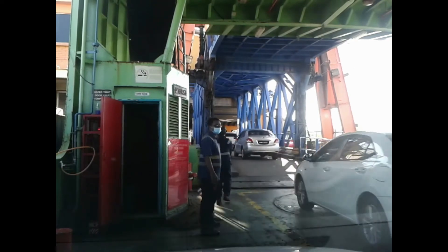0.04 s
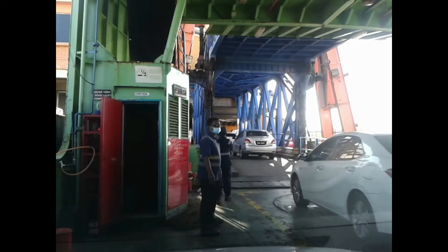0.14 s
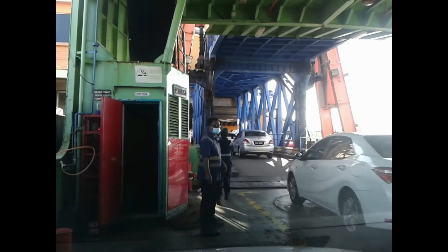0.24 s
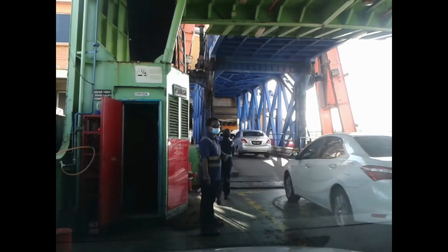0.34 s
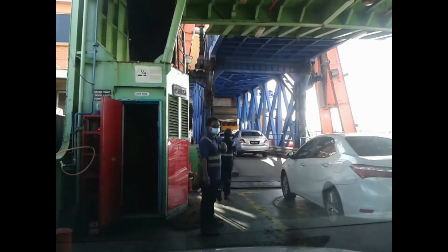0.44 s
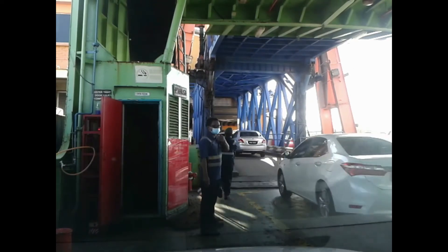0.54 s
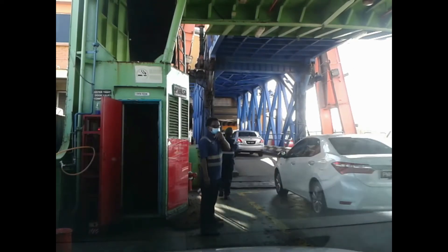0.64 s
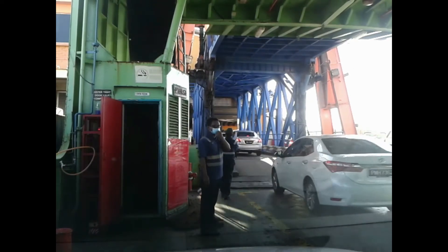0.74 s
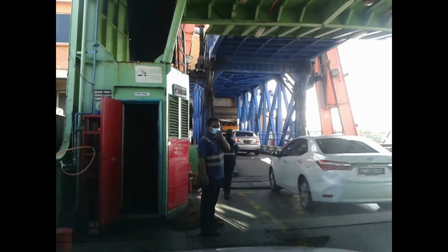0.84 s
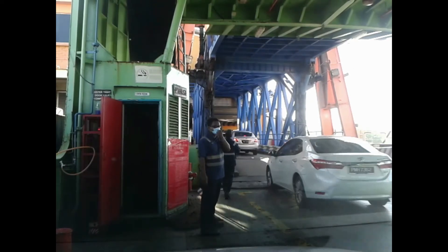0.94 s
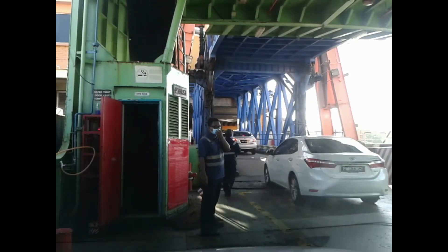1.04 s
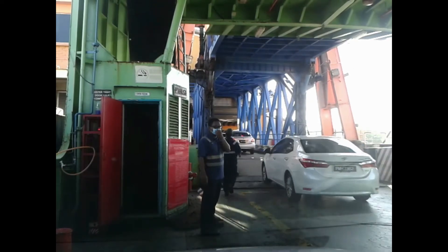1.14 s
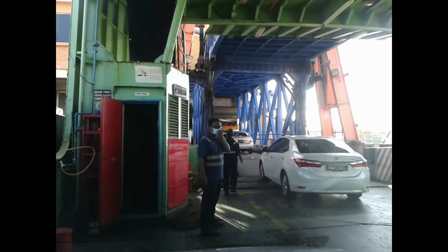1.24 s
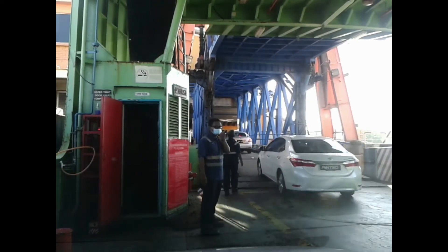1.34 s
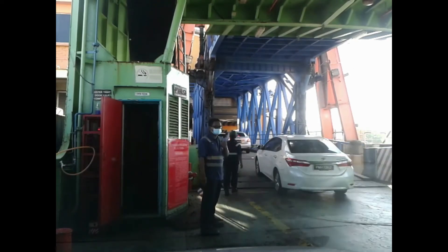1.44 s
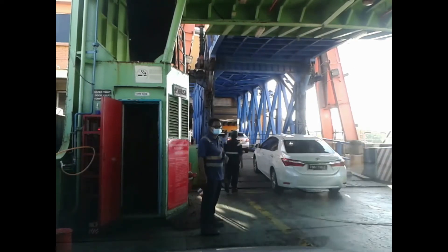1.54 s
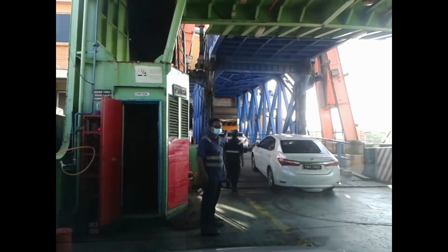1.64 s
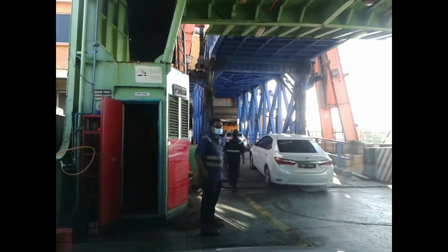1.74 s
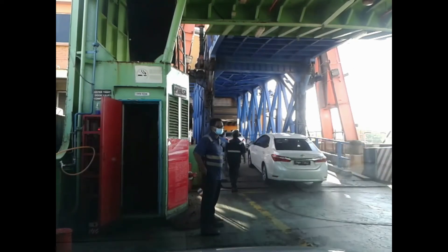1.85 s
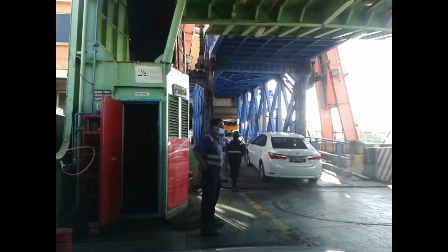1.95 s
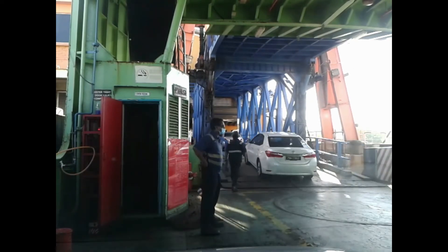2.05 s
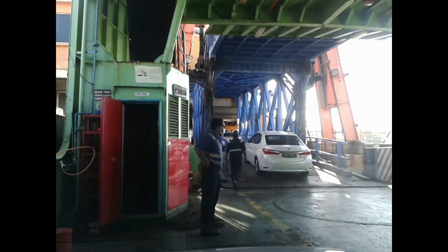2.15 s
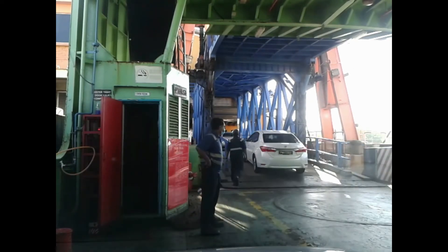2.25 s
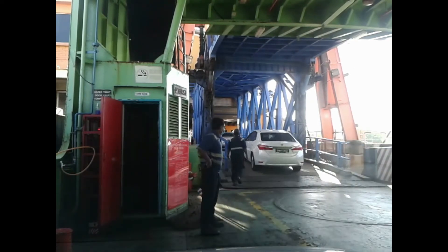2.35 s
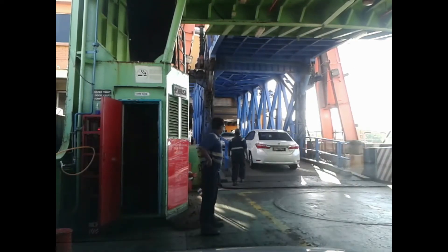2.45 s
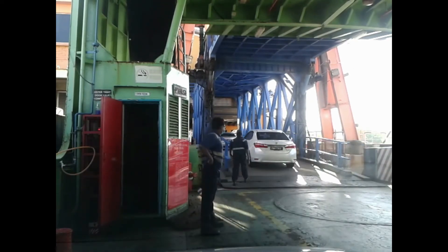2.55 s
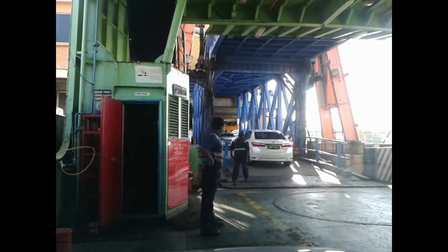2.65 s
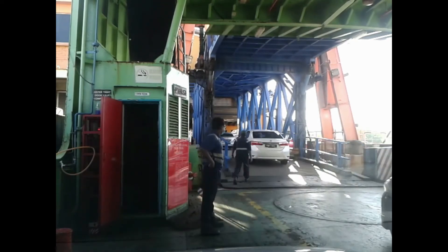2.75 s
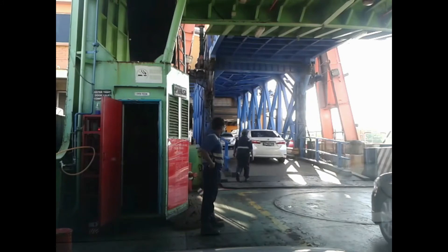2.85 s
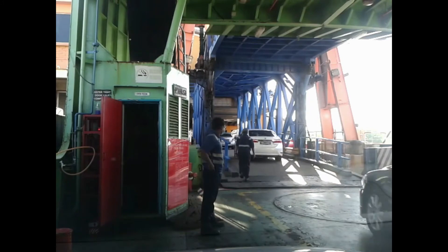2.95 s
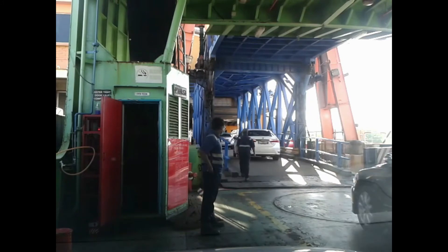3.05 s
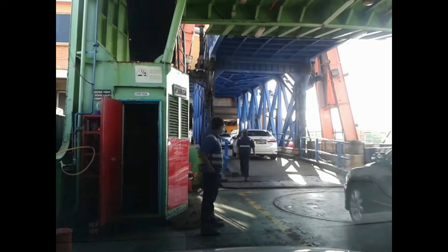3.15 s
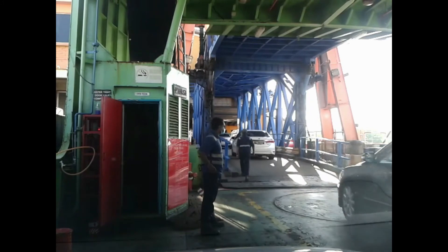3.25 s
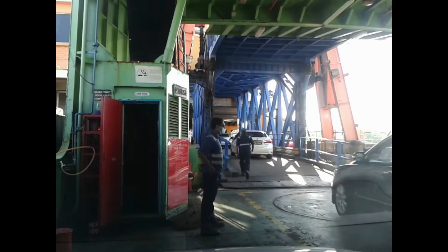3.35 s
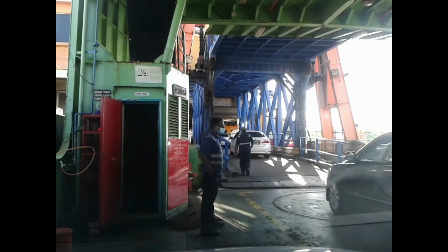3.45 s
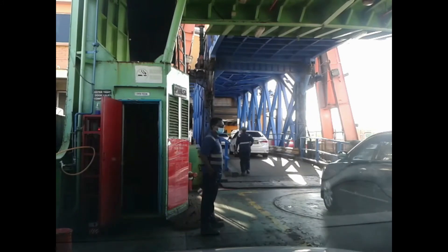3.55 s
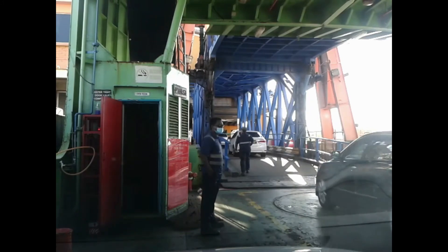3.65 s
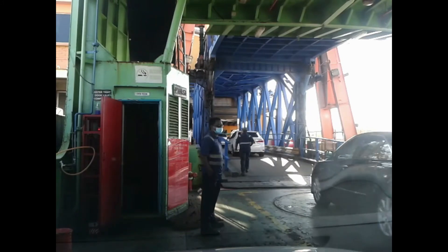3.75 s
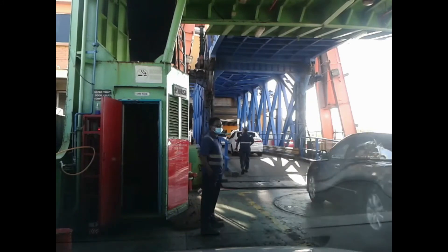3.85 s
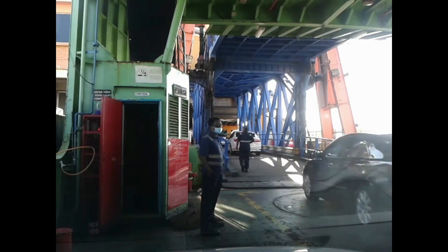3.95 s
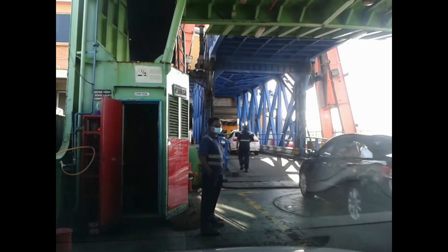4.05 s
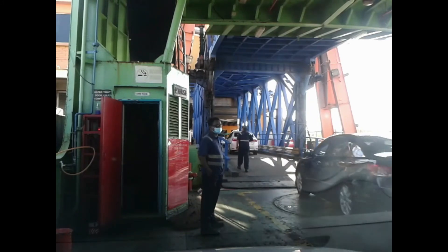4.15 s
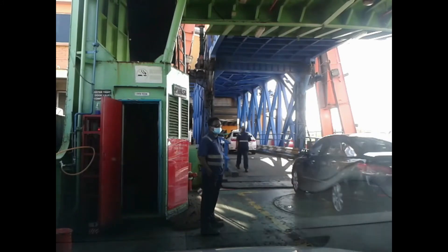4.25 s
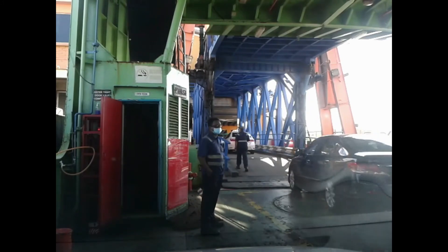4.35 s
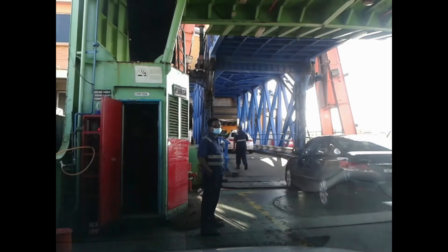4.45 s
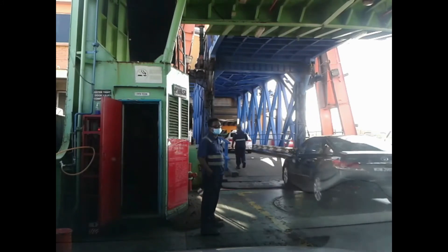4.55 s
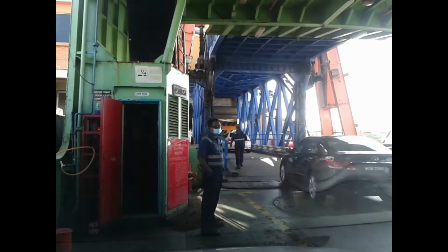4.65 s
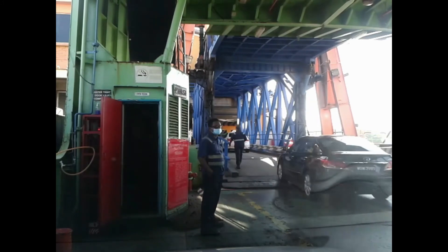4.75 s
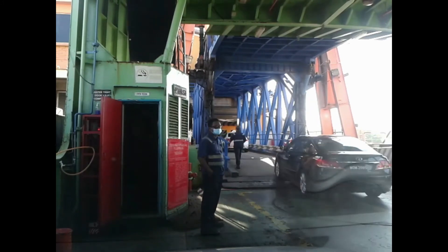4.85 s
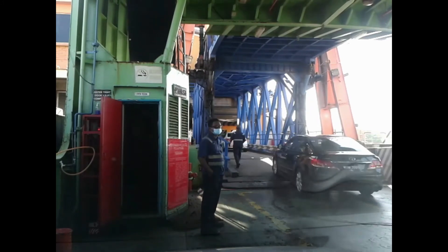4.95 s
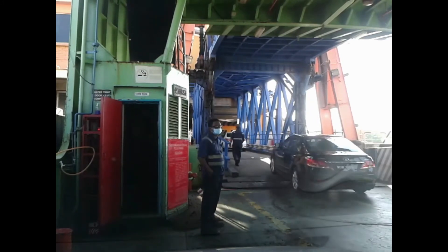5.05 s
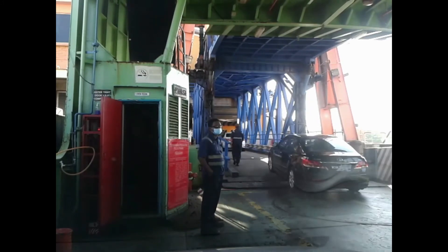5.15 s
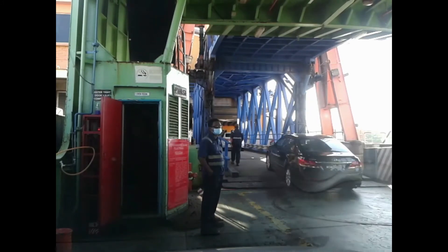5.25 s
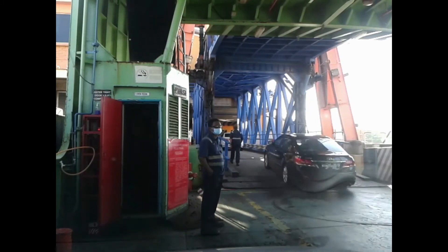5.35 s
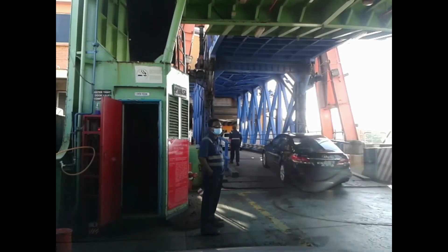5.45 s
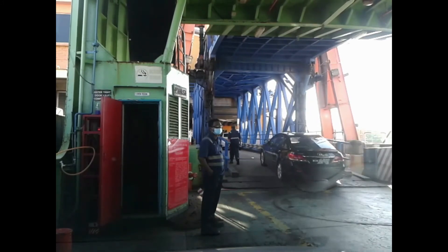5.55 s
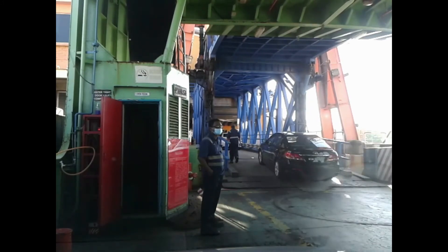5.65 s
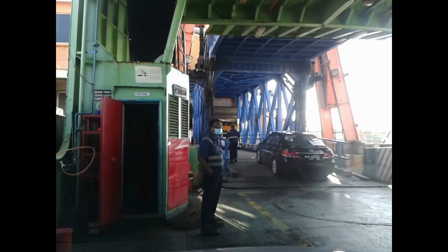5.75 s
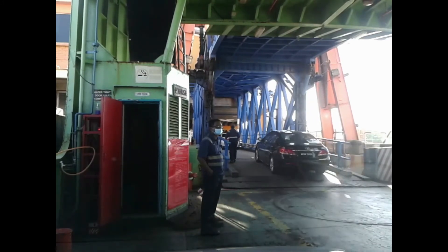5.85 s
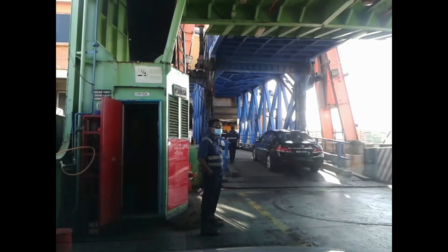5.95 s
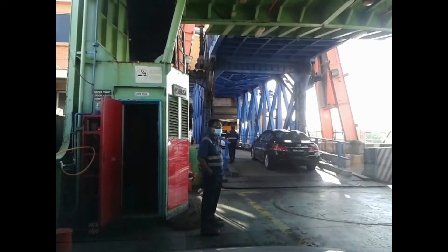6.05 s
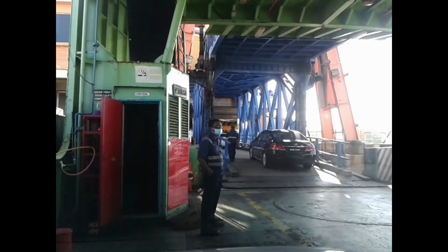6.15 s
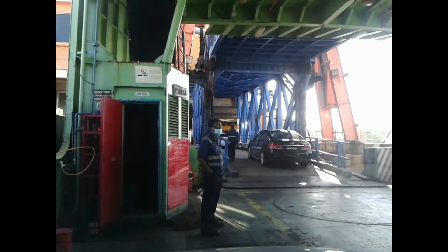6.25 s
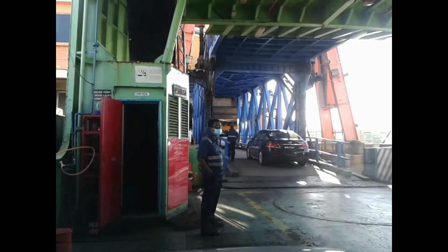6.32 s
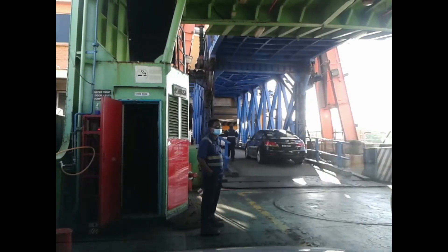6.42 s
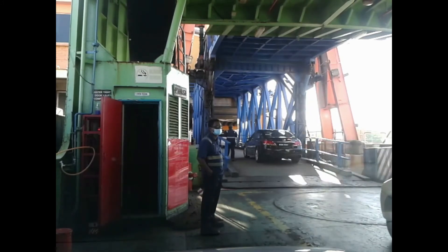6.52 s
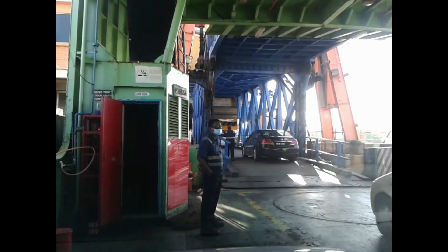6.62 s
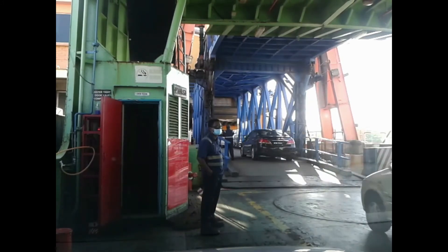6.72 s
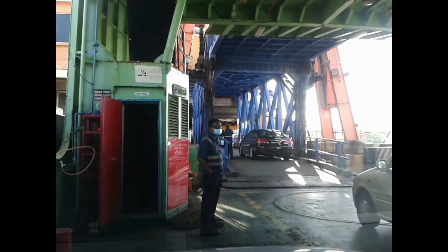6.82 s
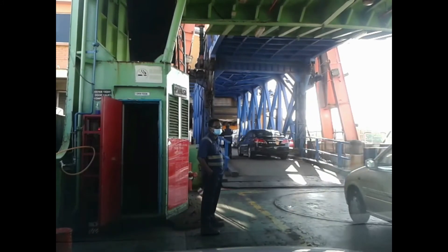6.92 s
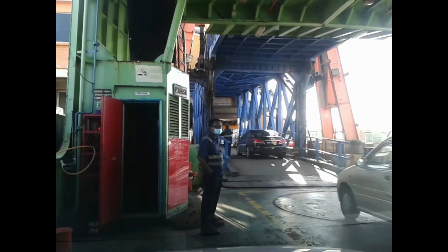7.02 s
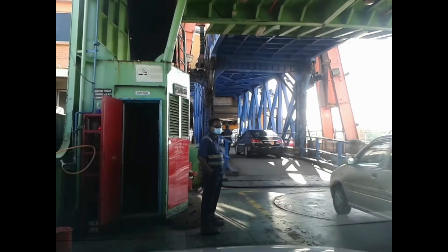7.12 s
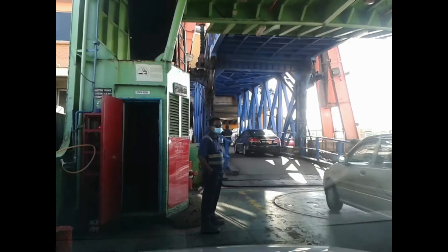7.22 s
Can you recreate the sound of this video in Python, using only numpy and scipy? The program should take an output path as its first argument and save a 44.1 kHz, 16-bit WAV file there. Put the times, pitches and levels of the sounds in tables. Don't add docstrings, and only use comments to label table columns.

```python
import sys
import numpy as np
from scipy import signal
from scipy.fft import rfft, irfft
from scipy.io import wavfile
from scipy.ndimage import uniform_filter1d

SR = 44100
rng = np.random.default_rng(int(sys.argv[2]) if len(sys.argv) > 2 else 0)


def int16_out(signal):
    q = np.round(np.clip(np.atleast_2d(signal).T, -1, 1) * 32767)
    wavfile.write(sys.argv[1], SR, q.astype(np.int16))


def ratio_of_db(decibels):
    return 10 ** (np.asarray(decibels, float) / 20)


N = 321048
T = np.arange(N) / SR


def rms_one(x):
    return x / np.sqrt(np.mean(x ** 2) + 1e-20)


def in_time(rows):
    s, level_db = np.transpose(rows)
    return np.interp(T, s, level_db)


def drift(rate):
    step = 40
    r = np.exp(-2 * np.pi * step * rate / SR)
    slow = signal.lfilter([1], [1, -2 * r, r * r], rng.standard_normal(N // step + 4002))[4000:]
    return np.interp(np.arange(N) / step, np.arange(len(slow)), rms_one(slow - slow.mean()))


def colour(x, spectrum):
    hz = np.maximum(np.fft.rfftfreq(N, 1 / SR), 1)
    points = np.array(spectrum)
    level_db = np.interp(np.log(hz), np.log(points[:, 0]), points[:, 1], left=-70, right=-90)
    return rms_one(irfft(rfft(x) * ratio_of_db(level_db), N))


def resonate(x, hz, width_hz):
    r = np.exp(-np.pi * abs(width_hz) / SR)
    zeros = [(1 - r * r) / 2, 0, (r * r - 1) / 2]
    poles = [1, -2 * r * np.cos(2 * np.pi * hz / SR), r * r]
    return signal.lfilter(zeros, poles, x)


def body(x, modes, wander_db=0):
    out = np.zeros(N)
    for k, (hz, width_hz, db) in enumerate(modes):
        strength_db = db + wander_db * drift(6.3) if wander_db else db
        out += (-1) ** k * ratio_of_db(strength_db) * resonate(x, hz, width_hz)
    return out


def grains(per_s, spread_db):
    size = ratio_of_db(spread_db * np.minimum(rng.exponential(1, N), 4)) * rng.choice([-1, 1], N)
    return rms_one(size * (rng.random(N) < per_s / SR))


def tone(hz, wobble_hz):
    phase = 2 * np.pi * np.cumsum(hz + wobble_hz * drift(1.72)) / SR
    return np.sqrt(2) * np.sin(phase + rng.uniform(0, 2 * np.pi))


# (wheel meets the edge [s], climb to full weight [s], time on the plates [s],
# bright shaking [dB], deep shaking [dB])
AXLES = [
    (1.068, .025, .35, -20, -19.5),
    (1.791, .17, .29, -21, -19.8),
    (4.605, .055, .28, -19.5, -20.8),
    (5.385, .055, .27, -19.5, -22),
]


def load(column, sag, lag_s, steep, first_fall, late_fall, offset_db):
    touch_s, touch_db, silent_db = 0.028, -6.5, -38.5
    first_fall_s = 0.14
    power = 0
    for axle in AXLES:
        start, climb, stay = axle[:3]
        age = T - start - lag_s
        after = np.maximum(T - start - stay, 0)
        step_db = touch_db * min(climb / 0.12, 1)
        rise_db = np.interp(age, [0, touch_s, touch_s + climb], [silent_db, step_db, 0])
        sag_db = sag * np.clip(age - climb, 0, stay)
        fall_db = first_fall * np.minimum(after, first_fall_s)
        fall_db = fall_db + late_fall * np.maximum(after - first_fall_s, 0)
        power = power + ratio_of_db(axle[column] + offset_db + steep * rise_db - sag_db - fall_db) ** 2
    return power ** .5


# (time [s], shaking [dB], rattle [dB])
SLAMS = [
    (1.12, -27, -33.5),
    (1.99, -21, -48),
    (4.675, -25, -33.5),
    (4.76, -24, -49),
    (5.6, -29, -47),
]


def slams(column):
    rise_s, decay_s = .012, .027
    out = np.zeros(N)
    for slam in SLAMS:
        age = np.maximum(T - slam[0], 0)
        out += 2 * ratio_of_db(slam[column]) * (1 - np.exp(-age / rise_s)) * np.exp(-age / decay_s)
    return out


# (frequency [Hz], width [Hz], level [dB])
PLATE = [(400, 84, -10), (527, 67.5, -7.5), (614.4, 53, -6.5), (733, 214, -15.5), (974, 90, -11.5),
         (1048, 36, -12.5), (1144, 34, -15), (1258, 57, -18), (1482, 56, -18.5), (1623, 70, -22.5),
         (1970, 390, -32.5), (2130, 25, -23), (2230, 680, -36)]
# (frequency [Hz], width [Hz], level [dB])
BEAM = [(70, 37, -10.5), (130, 45, -2), (201, 50, -2.5), (255, 51.5, -5)]
# (frequency [Hz], density [dB per Hz])
RATTLE = [(1200, -12.5), (2000, 5.5), (3200, 1.5), (5000, 8), (7000, -12.5), (8200, -24), (9500, -32.5),
          (12000, -46.5)]


def ramp():
    bumps = grains(per_s=2500, spread_db=2.0)
    flex = rms_one(body(bumps, BEAM))
    deep = body(bumps, PLATE[:4], wander_db=1.3)
    bright = body(bumps, PLATE[4:], wander_db=1.3)
    scale = np.sqrt(np.mean((deep + bright) ** 2))
    rattle = colour(grains(per_s=8000, spread_db=2.5), RATTLE)
    jolt = ratio_of_db(.5 * drift(25))

    deep_sag, bright_sag = 1.5, 14.2
    flex_gain = load(4, deep_sag, lag_s=.015, steep=.9, first_fall=45, late_fall=60, offset_db=1.2)
    deep_gain = load(4, deep_sag, lag_s=.006, steep=1.0, first_fall=55, late_fall=33, offset_db=-.9)
    bright_gain = load(3, bright_sag, lag_s=0, steep=.8, first_fall=55, late_fall=28, offset_db=-1.07)
    rattle_gain = load(3, bright_sag, lag_s=.02, steep=2.1, first_fall=100, late_fall=45, offset_db=-20)

    shaking = slams(column=1)
    plates = (np.hypot(deep_gain, shaking) * deep + np.hypot(bright_gain, shaking) * bright) / scale
    chatter = np.hypot(rattle_gain, slams(column=2)) * rattle
    return flex_gain * flex + jolt * (plates + chatter)


# (time [s], hold [s], level [dB])
CRUSH = [
    (1.107, 0.18, -43.5),
    (1.877, .08, -49),
    (4.67, .1, -46.5),
    (5.5, .08, -47.5),
]
# (frequency [Hz], density [dB per Hz])
GRIT_COLOUR = [(3000, -15.5), (4300, 2.5), (5500, -2.5), (7000, -4), (8200, -16.5), (9500, -36.5)]


def grit():
    rise_s, fall_db_per_s = 0.033, 100
    gain = np.zeros(N)
    for s, hold, db in CRUSH:
        swell = np.clip((T - s) / rise_s, 0, 1) ** 2
        gain += swell * ratio_of_db(db - fall_db_per_s * np.maximum(T - s - hold, 0))
    return gain * colour(grains(per_s=9000, spread_db=1.0), GRIT_COLOUR)


# (start [s], length [s], level [dB], extra level of its weaker partials [dB])
BAR_SPELLS = [
    (1.335, .12, 2, 2.5),
    (1.48, .14, 2, -10),
    (4.72, .3, -4, .5),
    (5.44, .36, -1.5, -1.5),
]
# (frequency [Hz], level [dB rms], joins [share of spell], leaves [share of spell])
BAR = [(5047, -52, 0, 1), (4245, -57, -.2, 1.1), (3145, -60, 0, 1.1), (2159, -55, -.1, .3),
       (7235, -66, .35, .85), (2813, -61, .4, .85)]
# (start [s], length [s], level [dB], level of its side partials [dB])
SHACKLE_SPELLS = [
    (1.24, .11, -63, -82),
    (1.43, .16, -72, -67),
    (4.675, .17, -63, -75),
    (4.93, .04, -69, -85),
    (5.49, .29, -65, -71),
]
# (frequency [Hz], level [dB], joins [share of spell], leaves [share of spell])
SHACKLE_SIDES = [(11125, 0, .1, .7), (10735, -1, .1, .6), (10945, 0, .05, .95), (8420, -3, .1, .6)]
# (start [s], end [s], frequency [Hz], level [dB rms])
LINK = [
    (.585, .77, 1606, -44.5),
    (.62, .72, 8500, -68),
]


def singing():
    notes = []
    for s, length, spell_db, weak_db in BAR_SPELLS:
        for hz, db, joins, leaves in BAR:
            level_db = db + spell_db + weak_db * (hz != BAR[0][0])
            notes.append((s + joins * length, s + leaves * length, hz, level_db))
    for s, length, main_db, side_db in SHACKLE_SPELLS:
        notes.append((s, s + length, 10870, main_db))
        for hz, db, joins, leaves in SHACKLE_SIDES:
            notes.append((s + joins * length, s + leaves * length, hz, side_db + db))

    out = np.zeros(N)
    for start, end, hz, level_db in notes + list(LINK):
        part = slice(int(start * SR), int(end * SR))
        size = part.stop - part.start
        swell = np.sin(np.linspace(0, np.pi, size)).clip(0) ** .35
        flutter = np.interp(np.arange(size), np.linspace(0, size, num=8), rng.standard_normal(8))
        phase = 2 * np.pi * np.cumsum(hz * (1 + .0008 * flutter)) / SR
        out[part] += ratio_of_db(level_db + 5 + 2.5 * flutter[::-1]) * swell * np.sin(phase)
    return out


# (time [s], peak [dB], fall by 60 dB [s], low knock [dB], hardness [dB])
CLICKS = [
    (.631, -33.5, 0.14, -25, -12),
    (2.041, -14, 0.086, -33, 0),
    (2.476, -38.5, 0.056, -56, -1),
    (2.569, -25.5, 0.075, -50, -1),
    (3.398, -44, 0.24, -31.5, -10),
    (4.684, -42, 0.067, -52, -4),
    (7.154, -45, 0.2, -45, -12),
]
# (frequency [Hz], density [dB per Hz])
CLICK = [(1200, -26.5), (2000, 0), (3000, -2), (3500, -5.5), (4000, 0.5), (5000, 5), (6600, -0.5),
         (8500, -4.5), (9800, -21), (11000, -13), (12000, -20.5)]
# (frequency [Hz], width [Hz], level [dB])
PANEL = [(1950, 200, -5), (2450, 250, -7), (3520, 260, 0), (4900, 300, -11)]


def clicks():
    crack = colour(rng.standard_normal(N), CLICK)
    panel = rms_one(body(rng.standard_normal(N), PANEL))
    knock = rms_one(body(rng.standard_normal(N), [(344, 37, 4.0), (1400, 210, -5)]))
    top = signal.sosfiltfilt(signal.butter(6, 8800, "high", fs=SR, output="sos"), crack)
    out = np.zeros(N)
    for s, peak_db, t60, knock_db, hard_db in CLICKS:
        snap = crack - top + ratio_of_db(1.2 * hard_db) * top
        rise_s = 0.0025 * ratio_of_db(.35 * (peak_db + 28.5))
        for lag, gain_db in ((0, 0.5), (.024, -22)):
            age = np.maximum(T - s - lag, 0)
            out += ratio_of_db(peak_db + gain_db - 60 * age / t60) * (1 - np.exp(-age / rise_s)) * snap
        late = np.maximum(T - s - .003, 0)
        out += ratio_of_db(peak_db + hard_db) * (1 - np.exp(-late / .0015)) * np.exp(-late / .007) * panel
        out += ratio_of_db(knock_db) * (1 - np.exp(-late / 0.0024)) * np.exp(-late / 0.028) * knock
    return out


def scuff():
    start, length, hz, width_hz = 6.87, .22, 2600, 1000
    swell = np.sin(np.pi * np.clip((T - start) / length, 0, 1))
    drag = rms_one(resonate(resonate(rng.standard_normal(N), hz, width_hz), hz, width_hz))
    streaks = rms_one(sum(resonate(drag, hz * share, 30) for share in (.83, .94, 1.04, 1.13)))
    return ratio_of_db(-52.5) * swell * (drag + .8 * streaks)


# (time [s], level [dB])
HUM = [(0.0, -27), (1.21, -24.5), (1.32, -30.5), (1.8, -23), (1.92, -32), (2.17, -23), (2.21, -34),
       (2.31, -24), (3.08, -28), (3.14, -34), (3.53, -27), (4.6, -27), (5.56, -20.5), (6.39, -28.5),
       (7.2, -24.5), (7.28, -28.5)]
# (frequency [Hz], level [dB rms])
ORDER_LINES = [(45.2, -45.5), (57.2, -40), (68.6, -43), (96.2, -39), (137.9, -37.5), (181, -41.5),
               (191.1, -37.5), (633, -48.5)]
# (time [s], level [dB])
DECK = [(0, -26), (.8, -25.5), (1.7, -24.5), (2.6, -26), (3.6, -26), (4.5, -25.5), (5.3, -26), (6.1, -28),
        (6.8, -25.5), (7.28, -24)]
# (frequency [Hz], density [dB per Hz])
ROAR = [(28, -40), (40, -21.5), (52, -3.5), (110, -5.5), (190, -2), (270, -7), (320, -14), (620, -15.5),
        (700, -16.5), (1000, -23), (1700, -30), (3500, -41.5), (5200, -42)]
# (frequency [Hz], width [Hz], level [dB])
DECK_MODES = [(125.2, 4.3, 8.5), (180.7, 12, -1), (260.5, 4.9, -1.5), (409.6, 16, -3), (542, 150, -9.5),
              (623.4, 12, 0), (932, 59, -1.5), (1033, 17, 3), (1142, 20, -4.5), (1264, 20, 3),
              (1560, 32, -4.5)]
# (frequency [Hz], density [dB per Hz])
HISS = [(1500, -6.5), (2700, -0.5), (4000, -8), (5500, -2.5), (7200, -7), (8000, -5.5), (8600, -11.5),
        (9500, -26), (12000, -29.5)]


def engine():
    hum_db = in_time(HUM)
    main_db = -.8 + hum_db + 2.4 * drift(5.0)
    second_db = -33.5 + .3 * (hum_db - hum_db.mean()) + 4.0 * drift(5.0)
    out = ratio_of_db(main_db) * tone(116.54, wobble_hz=0.7)
    out += ratio_of_db(second_db) * tone(150.9, wobble_hz=1.2)
    for hz, level_db in ORDER_LINES:
        out += ratio_of_db(level_db + 2.3 * drift(0.74)) * tone(hz, wobble_hz=0.33)

    roar_db = in_time(DECK)
    roar = colour(rng.standard_normal(N), ROAR)
    ringing = sum(ratio_of_db(db) * resonate(roar, hz, width_hz) for hz, width_hz, db in DECK_MODES)
    out += ratio_of_db(roar_db + 0.5 * drift(3.0)) * rms_one(roar + ringing)

    hiss_db = -51 + .05 * (roar_db - roar_db.mean()) + 0.72 * drift(3.3)
    return out + ratio_of_db(hiss_db) * colour(rng.standard_normal(N), HISS)


def scene():
    inside = engine() + singing() + clicks() + scuff()
    shell = signal.butter(8, 8300, fs=SR, output="sos")
    return (inside + signal.sosfilt(shell, ramp() + grit()))[None, :]


def gain_control(x, ceiling_db, ratio):
    level_db = 10 * np.log10(uniform_filter1d(x ** 2, size=700) + 1e-12)
    over_db = uniform_filter1d(np.maximum(level_db - ceiling_db, 0), size=300)
    return x * ratio_of_db(-ratio * over_db)


THINNED = [.493, .818, 1.422, 1.887, 2.212, 3.094, 3.187, 3.442, 3.86, 4.0, 4.046, 4.116, 4.348, 4.534,
           4.859, 5.045, 5.184, 5.37, 5.95, 6.415, 6.902, 6.949, 7.111]
BADLY_THINNED = [4.464, 4.603, 5.416, 6.531, 6.554]


def drop_weak_lines(x, top_db, top_hz):
    frame, lead = 1024, 774
    window = np.sin(np.pi * (np.arange(2 * frame) + .5) / (2 * frame))
    hz, s, lines = signal.stft(np.pad(x, (lead, 0)), SR, window, 2 * frame, frame)
    wander = ratio_of_db(1.6 * drift(12)[(s * SR).astype(int).clip(0, N - 1)])
    threshold = np.where(hz[:, None] > top_hz, ratio_of_db(top_db), 0) * wander
    middle = (hz > 2800) & (hz < 5500)
    for moments, lift_db in ((THINNED, 4.6), (BADLY_THINNED, 8.3)):
        for at in moments:
            k = np.argmin(abs(s - lead / SR - at))
            typical = np.median(abs(lines[middle, k]))
            masking = (uniform_filter1d(abs(lines[:, k]), size=40) / typical) ** .45
            threshold[:, k] = np.maximum(threshold[:, k], ratio_of_db(lift_db) * typical * masking)
    kept = lines * (abs(lines) > threshold)
    return signal.istft(kept, SR, window, 2 * frame, frame)[1][lead:lead + N]


def band_limit(x):
    return signal.sosfilt(signal.butter(12, 12250, fs=SR, output="sos"), x)


def record(dry):
    port = resonate(resonate(dry, 6560, 1500), 6560, 1500)
    x = dry + ratio_of_db(10.5) * port
    x = gain_control(x[0], ceiling_db=-16, ratio=0.49)
    x = 0.92 * np.tanh(x / 0.86)
    mix = drop_weak_lines(x, top_db=-79.0, top_hz=7540)[None, :]
    return band_limit(mix)


dry = scene()
out = record(dry)
int16_out(out)
```